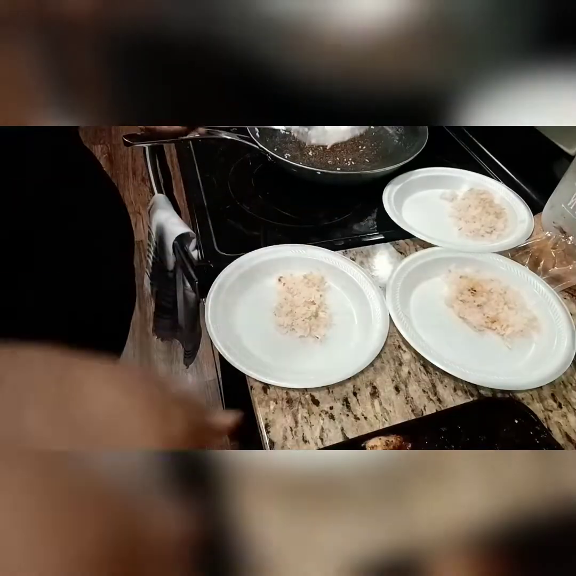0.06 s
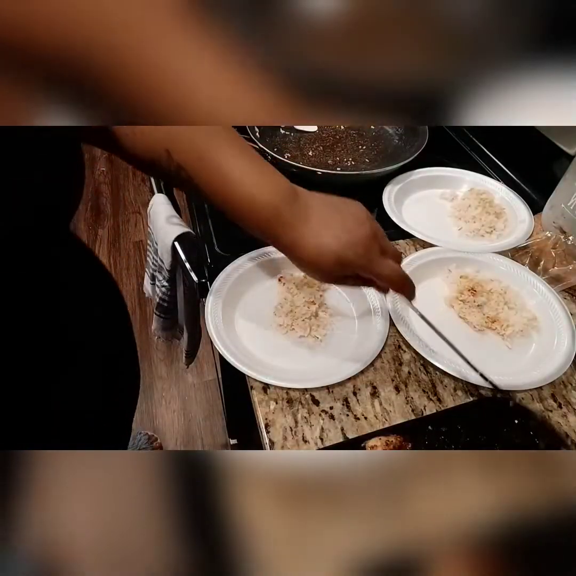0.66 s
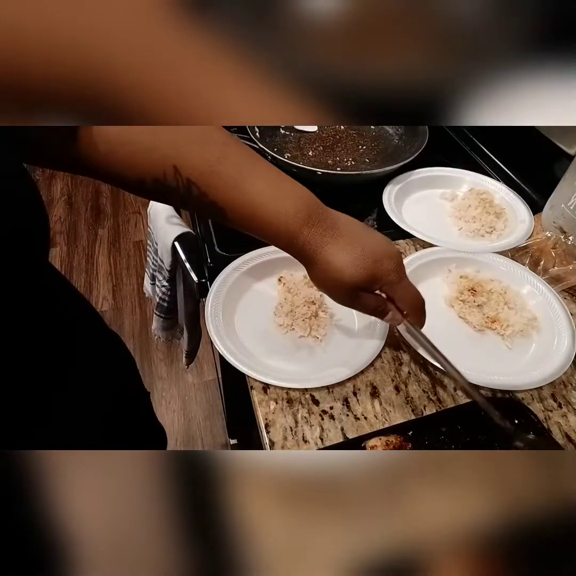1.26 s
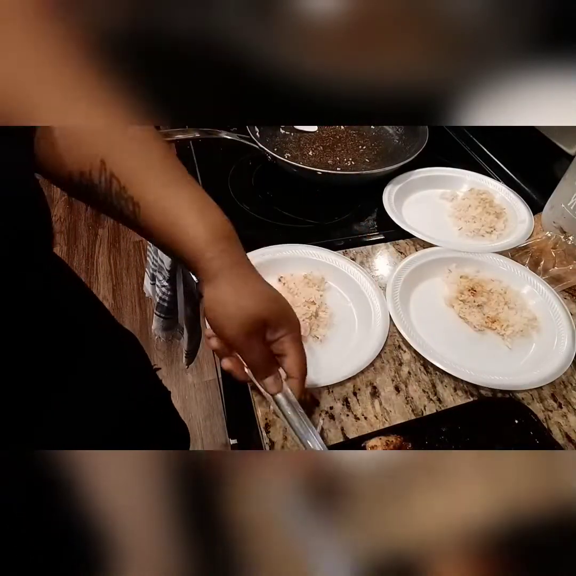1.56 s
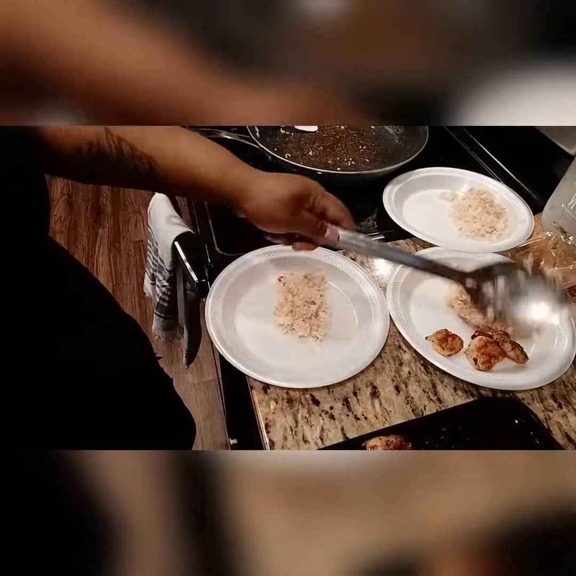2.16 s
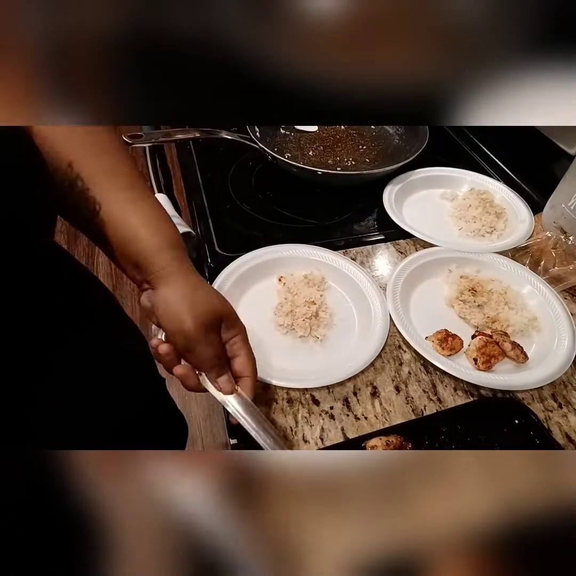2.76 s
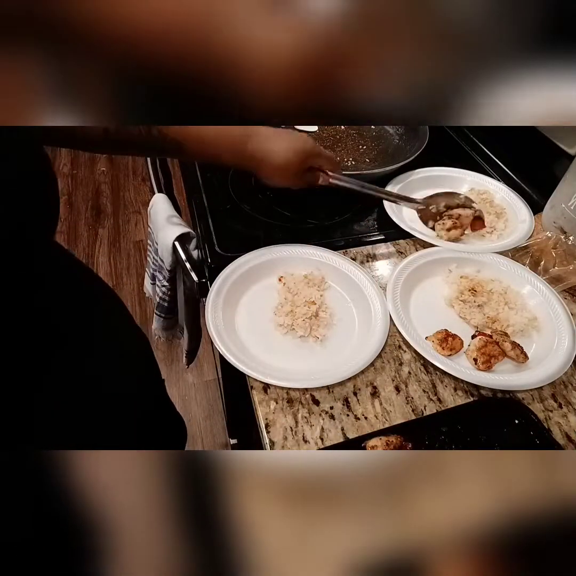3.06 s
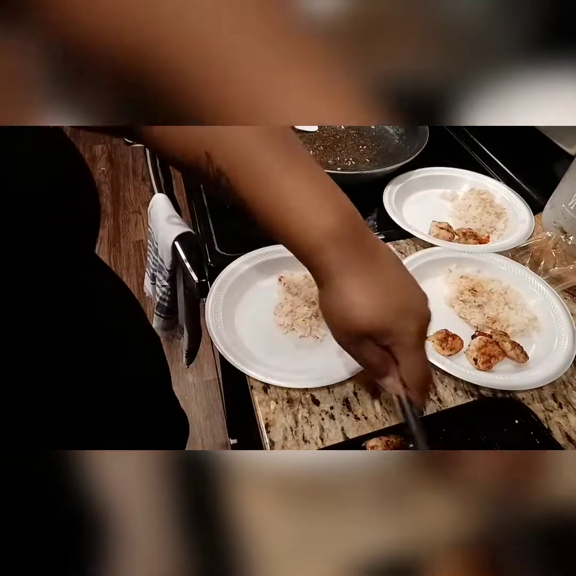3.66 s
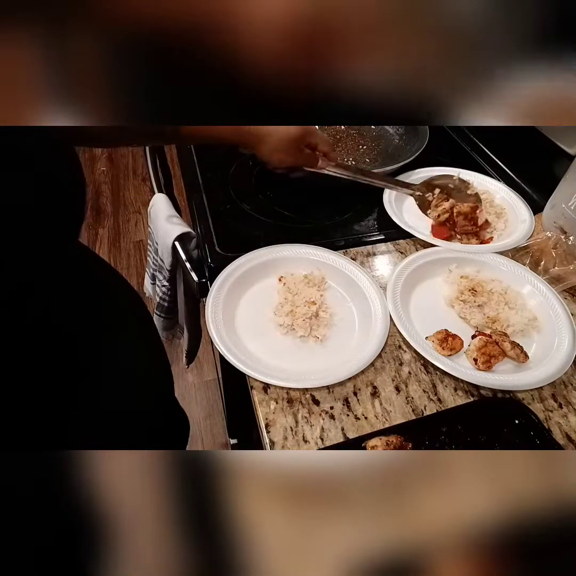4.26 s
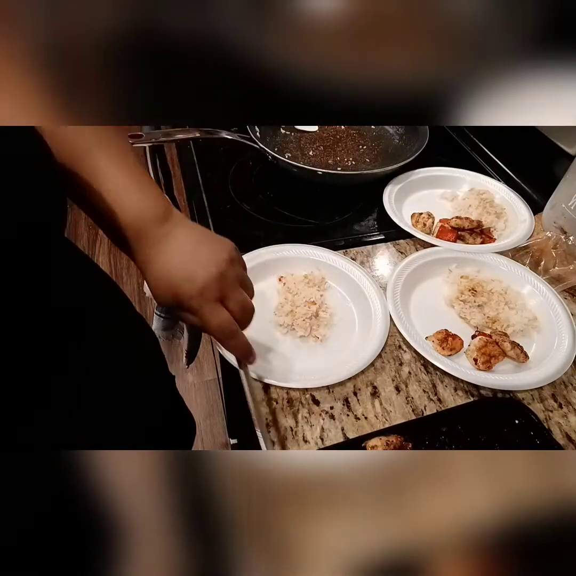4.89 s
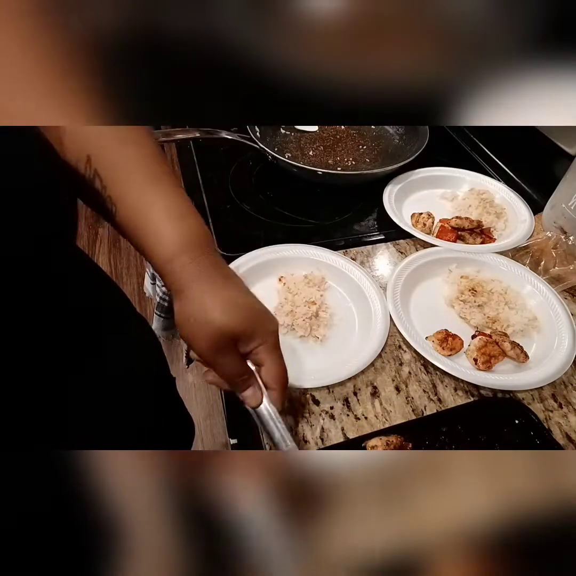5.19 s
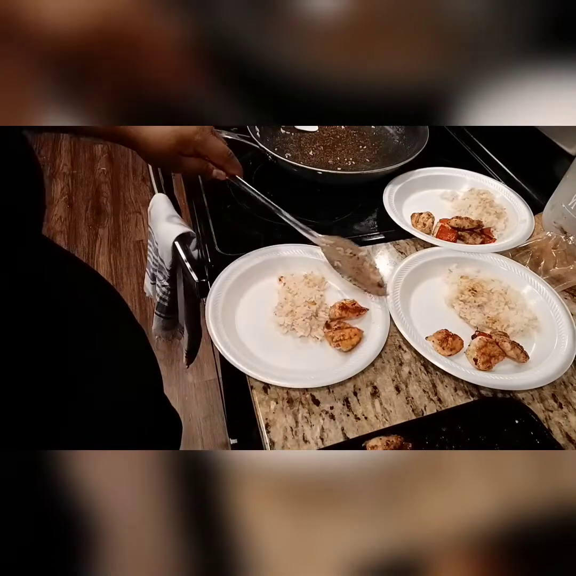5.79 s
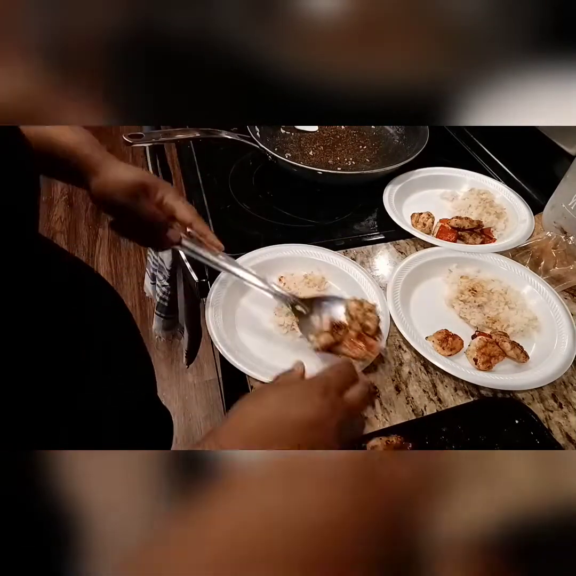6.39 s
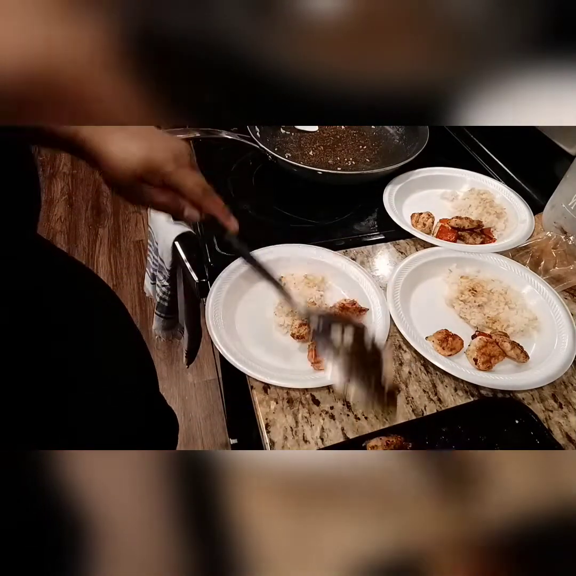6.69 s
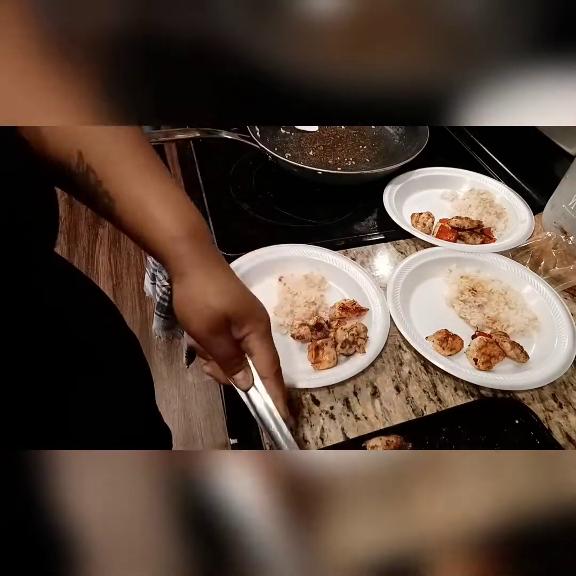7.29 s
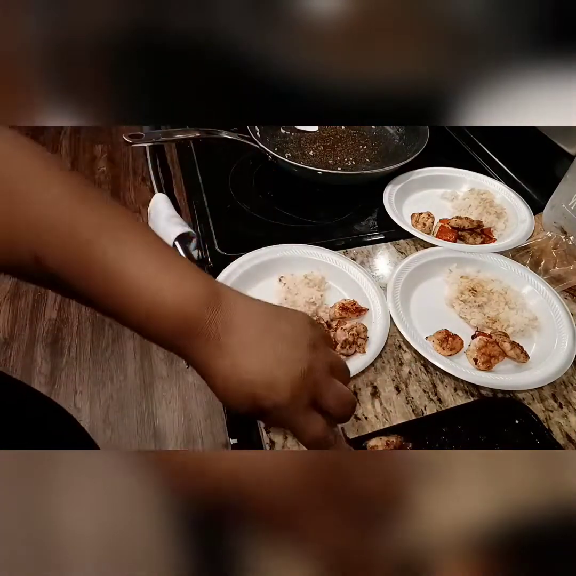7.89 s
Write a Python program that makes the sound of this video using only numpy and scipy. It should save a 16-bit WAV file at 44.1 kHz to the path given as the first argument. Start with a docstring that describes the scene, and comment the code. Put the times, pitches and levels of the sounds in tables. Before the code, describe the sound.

Close metal tongs knock against a pan between soft landings of food, while an appliance hums and a fan runs.

```python
"""Steel tongs knock and scrape in a skillet as food is served onto foam plates.
Small, hard-walled kitchen; close up, on the stereo microphones of a hand-held phone.
Food lands softly, clothing swishes; a few faint, dull thuds, then a muffled thump at the microphone.
Behind it an appliance hums with an even throb, over a fan's low rush and a faint, regular chafing.
The phone's gain control ducks after loud blows."""
import sys
import numpy as np
from scipy import signal
from scipy.fft import rfft, irfft
from scipy.io import wavfile
from scipy.ndimage import uniform_filter1d

SR = 44100
rng = np.random.default_rng(int(sys.argv[2]) if len(sys.argv) > 2 else 0)


def pcm_store(signal):
    """Save signal as 16-bit PCM."""
    levels = np.round(np.clip(np.atleast_2d(signal), -1, 1) * 32767)
    wavfile.write(sys.argv[1], SR, levels.astype(np.int16).T)


N = 355005
TIME = np.arange(N) / SR

# tongs strike the skillet: (time [s], rise [s], relative level [dB], body over level [dB],
# clang over ring [dB], top over level [dB], tong modes over pan modes [dB], share of free ring time [-])
TONG_BLOWS = [(1.1512, 0.0016, -14.5, -3.5, 1, -23.5, 6, 0.66),
              (1.2434, 0.0011, -20.5, -1, -6.5, -9.5, -3, 0.34),
              (2.229, 0.0045, -43, -1, 1.5, -2.5, 11.5, 0.43),
              (3.4373, 0.0044, -37, -1, -11, -36, -9, 0.36), (3.568, 0.017, -33.5, 2, -2.5, -6, -10, 0.47),
              (3.604, 0.0042, -24, -0.5, 0, -8.5, 2, 0.27),
              (4.776, 0.012, -24.5, -13.5, -11, -9.5, 5, 0.47),
              (4.8574, 0.0011, -27, -9.5, 4, 4, 14.5, 0.47), (5.042, 0.0034, -33.5, 2.5, 2, -2.5, -1, 0.38),
              (5.912, 0.017, -34, -1, 7, -4, 2, .35), (7.096, .014, -31, 2, 6.5, -3, 18, 0.28),
              (7.162, 0.0054, -51.5, 8, 4, -8, 6, 0.42),
              (7.8442, 0.0015, -20.5, -17.5, 5, -19.5, 8.5, 0.41),
              (7.876, 0.0062, -34, -8.5, 9, -6.5, 2, 0.35)]
# edges of the body, ring, clang and top bands: (frequency [Hz])
BAND_EDGES_HZ = [250, 800, 2200, 6000, 16000]
# resonances of the skillet and of the tongs: (frequency [Hz], relative level [dB], free t60 [s])
SKILLET_RING = [(235, -3, .15), (470, -14, .12), (560, -1, .14), (964, -4, .17), (1110, -3, .18),
                (1177, -4, .16), (1270, -5, .25), (1597, -7, .21), (1788, 1, .22), (1937, -3, .27),
                (2226, -8, .12), (2522, -3, .24), (2735, -4, .22), (2830, -4, .2), (3634, -13, .1),
                (3912, -4, .16), (4430, -10, .28), (4700, -9, .28), (5308, -17, .24), (6750, -13, .1),
                (7612, -18, .12)]
TONG_RING = [(1575, -4, .2), (1945, -9, .16), (2520, 3, .12), (2890, -4, .11), (3009, -5, .1),
             (3940, -12, .12), (4619, -12, .1), (4800, -9, .12), (5833, -14, .1), (7880, -16, .1),
             (10100, -17, .07), (11650, -18, .07), (12300, -16, .07), (13900, -18, .07)]
# tongs dragged across the pan: (start [s], length [s], relative level [dB])
TONG_DRAGS = [(1.154, .197, -31), (1.371, 0.023, -35)]
# steel on steel, struck and dragged: (frequency [Hz], gain [dB])
CRACK_SPECTRUM = [(200, -2), (370, -6), (540, 5), (820, -10), (1130, -1), (1400, -1), (1800, 0), (2850, 3),
                  (3450, -8), (4600, -3), (6000, -10), (8500, -13), (12000, -10), (16000, -11)]
SCRAPE_SPECTRUM = [(120, -29.5), (220, -18.5), (350, -11.5), (580, 2), (780, -7.5), (1100, 1), (1700, -6.5),
                   (2300, -7), (2800, -6), (3400, -16.5), (4500, -6.5), (6500, -24.5), (12000, -22.5),
                   (16000, -30)]
# food and tongs touch the plates: (time [s], rise [s], level [dB], tilt per band [dB])
PLATE_TOUCHES = [(1.493, 0.0044, -71.5, 7.5), (1.954, 0.0054, -59.5, 1.5), (2.54, 0.0057, -69, 5.5),
                 (3.008, 0.0012, -58.5, -1.5), (4.203, .001, -73, 0), (4.378, 0.0051, -60, -5),
                 (5.691, 0.0057, -56, -4.5), (5.719, 0.007, -54.5, -5.5), (6.435, .006, -59, -1.5),
                 (6.851, 0.0035, -59.5, -3), (7.607, 0.0015, -51.5, -1.5), (7.635, 0.0081, -52.5, 2.5)]
# food leaving the tongs, a reaching arm, muffled shuffling: (peak time [s], half length [s], level [dB])
FOOD_SLIDES = [(1.99, 0.033, -60.5), (2.28, 0.043, -58.5), (2.5, 0.099, -67.5), (3.1, .02, -58.5),
               (3.24, 0.011, -60), (3.39, .04, -60.5), (3.8, .025, -64.5), (4.355, 0.013, -51),
               (6.47, 0.044, -71), (6.82, 0.11, -66)]
ARM_SWISHES = [(.245, 0.096, -49.5), (.88, 0.041, -56), (1.06, 0.12, -44), (7.303, 0.021, -45.5),
               (7.435, 0.039, -49.5), (7.58, 0.014, -62), (7.67, 0.058, -57), (7.738, 0.014, -52.5)]
CLOTH_SHUFFLES = [(.11, 0.068, -45.5), (.495, .045, -45), (3.41, .07, -50.5)]
# cloth fibres near the microphones: (frequency [Hz], gain [dB])
CLOTH_SPECTRUM = [(410, -22), (700, -9.5), (1150, -10.5), (1380, -8.5), (1970, -6), (3500, -5.5),
                  (5060, -2.5), (7990, -11.5), (13000, -12.5), (16000, -20.5)]
# a faint low bump, two faint thuds, then a close thump in four pushes: (time [s], relative level [dB], push
# length [s])
LOW_THUDS = [(1.36, -30, 0.014), (4.425, -28, 0.012), (4.585, -27.5, 0.01), (5.2466, -7, 0.0037),
             (5.2585, -9.5, 0.0065), (5.274, -11.5, 0.0042), (5.285, -17, 0.0029)]
# their boomy resonances: (frequency [Hz], relative level [dB], t60 [s])
THUD_RING = [(70, -16.5, 0.11), (105, -5, 0.032), (191, -2.5, 0.027), (228.4, -5, 0.11), (348, -40, .05)]
# course of the appliance hum: (time [s], relative level [dB], throb depth [dB])
HUM_COURSE = [(0, -33.5, 1), (.15, -34.5, 1.5), (.33, -37, -0.5), (.65, -30.5, -1), (1.199, -36.5, 0.5),
              (2, -34, 1.9), (8.05, -34.5, 1.6)]
# partials of the hum: (harmonic number [-], relative level [dB])
HUM_HARMONICS = [(1, 7.5), (2, -30.5), (3, -42.5)]
# fan and room tone: (frequency [Hz], density [dB per Hz])
FAN_SPECTRUM = [(25, -106), (60, -83), (100, -74.5), (165, -74.5), (250, -75), (330, -73.5), (450, -83),
                (600, -88.5), (1000, -100.5), (2000, -108), (3200, -115), (5000, -113), (8000, -119),
                (15000, -119.5)]
# the faint chafing: (frequency [Hz], gain [dB])
CHAFE_SPECTRUM = [(900, -27), (1600, -10), (1900, 2.5), (2300, -18.5), (3500, -21), (4700, -19),
                  (5300, -17), (6300, -21), (9000, -31)]


def tong_clanks(crack_db=13, scatter_db=-4, scatter_s=.026, rough_db=3.5, metal_db=-4.5, bounce_s=.003):
    """Each blow is a gritty crack, its scatter off hob and counter, and the ring of pan and tongs."""
    out, t = np.zeros((2, N)), np.arange(SR // 3) / SR
    # a short, fixed pattern of close reflections off the counter, different at each microphone
    bounce = colour(noise(len(t)), CRACK_SPECTRUM) * np.exp(-t / bounce_s) * np.sqrt(2 / (bounce_s * SR))
    for s, rise_s, db, body_db, bright_db, top_db, tongs_db, free in TONG_BLOWS:
        fall_s = .003 + .63 * rise_s  # a contact that builds slowly lets go slowly
        force = pressure(t, rise_s, fall_s)
        crack = signal.fftconvolve(force * grit(len(t), rough_db)[:1], bounce)[:, :len(t)]
        direct = force * colour(grit(len(t), rough_db), CRACK_SPECTRUM)
        scatter = pressure(t, rise_s, scatter_s) * colour(noise(len(t)), CRACK_SPECTRUM)
        clatter = amp(crack_db) * (crack + direct) / np.sqrt(2) + amp(scatter_db) * scatter
        # each doubling of the contact time pumps the modes 5 dB harder
        pump_db = metal_db + 5 * np.log2((rise_s + fall_s) / .01)
        metal = ring(SKILLET_RING, force, t, free) + amp(tongs_db) * ring(TONG_RING, force, t, free)
        band_db = db + np.array([body_db, -bright_db / 2, bright_db / 2, top_db])
        add(out, s, set_bands(clatter + amp(pump_db) * metal, band_db))
    return out


def ring(modes, force, t, free, spread_db=1.5, split=.006, count=4):
    """Steel modes pumped by a force; grip and food damp each and split it into close partials."""
    out = 0
    for hz, db, t60 in modes:
        decay = np.exp(-np.log(1000) / (free * t60 * SR))
        swell = signal.lfilter([1 / force.sum()], [1, -decay], force)
        phase = rng.uniform(0, 2 * np.pi, (count, 1, 1))
        mic_phase = phase + rng.uniform(-np.pi, np.pi, (count, 2, 1)) * min(hz / 1800, 1)
        partials_hz = hz * (1 + split / free * rng.uniform(-.83, 1, (count, 1, 1)))
        tone = np.sin(2 * np.pi * partials_hz * t + mic_phase).sum(0) / np.sqrt(count)
        out = out + amp(db + spread_db * rng.standard_normal()) * swell * tone
    return out


def tong_scrape(bite_s=.012, lift_s=.006, rough_db=3, uneven_db=2, rasp_db=-2, ring_db=-4):
    """Steel sticks and slips on the pan floor under an uneven hand, keeping the pan ringing."""
    t = np.arange(SR // 4) / SR
    load = 0
    for s, length_s, db in TONG_DRAGS:
        bite = np.clip((TIME - s) / bite_s, 0, 1)
        lift = np.exp(-np.maximum(TIME - s - length_s, 0) / lift_s)
        load = load + amp(db) * bite * lift
    slips = grit(N, rough_db) * load * amp(uneven_db * walk(130))
    rasp = colour(slips, SCRAPE_SPECTRUM)
    ping = ring(SKILLET_RING, pressure(t, .00033, .00019), t, free=.48)
    pan = signal.fftconvolve(slips, ping, axes=1)[:, :N]
    return (amp(rasp_db) * unit(rasp) + amp(ring_db) * unit(pan)) * slips.std()


def plate_dabs(fall_s=.0061, rough_db=3):
    """Soft, damp contacts on foam plates, with no ring."""
    out, t = np.zeros((2, N)), np.arange(SR // 5) / SR
    for s, rise_s, db, tilt_db in PLATE_TOUCHES:
        touch = pressure(t, rise_s, fall_s + rise_s) * grit(len(t), rough_db)
        add(out, s, set_bands(touch, [db - tilt_db, db, db + tilt_db]))
    return out


def food_slides(rough_db=3):
    """Saucy food peels off the steel with a fine crackle that trails away."""
    spectrum = [(300, -9), (1500, 5.5), (5000, -3), (8000, -11.5), (14000, -10)]
    crackle = unit(colour(grit(N, rough_db), spectrum))
    return swells(FOOD_SLIDES, linger=2.3, steep=1.5) * crackle


def clothing(rough_db=2.34):
    """Close to the phone, cloth fibres brush past each other and the folds shuffle low and dull."""
    fold_spectrum = [(60, -22), (150, 4.5), (400, 2), (700, -12), (1500, -19), (4000, -60.5)]
    folds = unit(colour(noise(N), fold_spectrum))
    fibres = unit(colour(grit(N, rough_db), CLOTH_SPECTRUM))
    swishes = swells(ARM_SWISHES, linger=.85, steep=1.26) * fibres
    return swishes + swells(CLOTH_SHUFFLES, linger=.9, steep=1.3) * folds


def low_thuds(scuff_db=-28):
    """Faint, dull thuds, some like soft footsteps, then a muffled thump close to the microphone."""
    out, t = np.zeros((2, N)), np.arange(SR // 3) / SR
    scuff_spectrum = [(40, -36.5), (200, -1), (500, -6), (1000, -19), (4000, -32.5), (15000, -52)]
    modes = sum(-amp(db) * fade(t, t60) * np.cos(2 * np.pi * hz * t) for hz, db, t60 in THUD_RING)
    for s, db, push_s in LOW_THUDS:
        push = np.sin(np.pi * np.minimum(t / push_s, 1)) ** 2  # a longer push is duller
        boom = signal.fftconvolve(modes, push / push.sum())[:len(t)]
        scuff = unit(colour(noise(len(t)), scuff_spectrum)) * pressure(t, .0042, .035)
        add(out, s, amp(db) * (boom + amp(scuff_db) * scuff))
    return signal.sosfilt(signal.butter(2, 45, "high", fs=SR, output="sos"), out)


def appliance_hum(hz=120.1, throb_hz=2.21, crest_s=2.055, waver_db=2.4, left_db=-1.7, right_db=.47):
    """Twice the mains frequency, a little to the right; it swells once, then settles into a throb."""
    tone = sum(amp(db) * np.sin(2 * np.pi * k * hz * TIME) for k, db in HUM_HARMONICS)
    s, db, depth_db = np.transpose(HUM_COURSE)
    throb_db = np.interp(TIME, s, depth_db) * np.cos(2 * np.pi * throb_hz * (TIME - crest_s))
    level_db = np.interp(TIME, s, db) + throb_db + waver_db * walk(11)
    return unit(tone) * amp(level_db) * amp([[left_db], [right_db]])


def fan(flutter_db=1.5):
    """Room tone: the low, slightly unsteady rush of moving air."""
    rush = colour(noise(N, alike_hz=550), FAN_SPECTRUM) * np.sqrt(SR / 2)
    return rush * amp(flutter_db * walk(15))


def chafe(first_s=1.635, period_s=.606, half_s=.066, db=-64, uneven_db=2):
    """A faint, regular brushing in the background, as of a turning part, never quite equally hard."""
    moments = np.arange(first_s, N / SR, period_s)
    strokes = [(s, half_s, db + uneven_db * rng.standard_normal()) for s in moments]
    return swells(strokes, linger=1, steep=2.5) * unit(colour(noise(N), CHAFE_SPECTRUM))


def kitchen(x, wet_db=-18, low_t60=.3, high_t60=.18, build_s=.015):
    """A small hard room from close up: mostly direct sound, and a short tail whose treble dies first."""
    t = np.arange(int(.7 * SR)) / SR
    low = colour(noise(len(t)), [(200, 0), (1800, 0), (3000, -5), (8000, -18)]) * fade(t, low_t60)
    high = colour(noise(len(t)), [(2000, -28.5), (8000, 3.5)]) * fade(t, high_t60)
    tail = (low + high) * np.minimum(t / build_s, 1)
    tail /= np.sqrt(np.sum(tail ** 2) / 2)
    return x + amp(wet_db) * signal.fftconvolve(x, tail, axes=1)[:, :N]


def gain_control(x, threshold_db=-33, ratio=1.3, memory_s=.27, lag_s=.055):
    """The phone's gain sinks after loud sounds and recovers as their level is forgotten."""
    level_db = 10 * np.log10(follow(np.mean(x ** 2, axis=0), memory_s) + 1e-12)
    cut_db = np.maximum(level_db - threshold_db, 0) * (1 - 1 / ratio)
    return amp(-follow(cut_db, lag_s))


def pressure(t, rise_s, fall_s):
    """Contact force: builds up, then lets go."""
    return np.minimum(t / rise_s, 1) * np.exp(-np.maximum(t - rise_s, 0) / fall_s)


def swells(rows, linger, steep):
    """Envelope of smooth strokes: a bell around each peak, its far side scaled in time by linger."""
    out = 0
    for s, half_s, db in rows:
        away = (TIME - s) / np.where(TIME < s, half_s, half_s * linger)
        out = out + amp(db) * (1 + away ** 2) ** -steep
    return out


def set_bands(x, band_db):
    """Set each band's loudest 20 ms, from the top down: dry contact is bright, damp contact dull."""
    out = 0
    for lo, hi, db in zip(BAND_EDGES_HZ[-2::-1], BAND_EDGES_HZ[::-1], band_db[::-1]):
        band = signal.sosfilt(signal.butter(2, [lo, hi], "band", fs=SR, output="sos"), x)
        peak_rms = np.sqrt(uniform_filter1d(np.mean(band ** 2, axis=0), SR // 50).max())
        out = band * amp(db) / peak_rms - out  # signs alternate: neighbours meet in opposite phase
    return out


def grit(n, spread_db, size=12):
    """Noise broken into tiny contacts of uneven strength."""
    hiss = noise(n)
    strengths = amp(spread_db * np.minimum(rng.exponential(1, n // size + 1), 5))
    return unit(hiss * np.repeat(strengths, size)[:n])


def noise(n, alike_hz=450):
    """Noise at the two microphones: the same in the bass, unrelated in the treble."""
    mid, side = rfft(rng.standard_normal((2, n)))
    hz = np.arange(n // 2 + 1) * SR / n + 1
    apart = .5 / (1 + (alike_hz / hz) ** 2)
    return irfft(np.sqrt(1 - apart) * mid + np.sqrt(apart) * side * np.array([[1], [-1]]), n)


def colour(x, points):
    """Filter by a curve of (frequency [Hz], gain [dB])."""
    n = x.shape[-1]
    hz, db = np.transpose(points)
    bins_hz = np.arange(n // 2 + 1) * SR / n + 1
    return irfft(rfft(x) * amp(np.interp(np.log(bins_hz), np.log(hz), db)), n)


def walk(rate_hz):
    """Smooth random drift around zero."""
    k = int(SR / rate_hz)
    return .43 * uniform_filter1d(np.repeat(rng.standard_normal(N // k + 1), k), k)[:N]


def follow(x, lag_s):
    """One-pole smoothing."""
    pole = np.exp(-1 / (lag_s * SR))
    return signal.lfilter([1 - pole], [1, -pole], x)


def fade(t, t60):
    """Decay by 60 dB in t60 seconds."""
    return np.exp(-np.log(1000) * t / t60)


def amp(db):
    """Decibels to gain."""
    return 10 ** (np.asarray(db) / 20)


def unit(x):
    """Scale to an rms of one."""
    return x / np.sqrt(np.mean(x ** 2))


def add(out, s, x):
    """Mix a stereo sound in at s seconds."""
    i = int(s * SR)
    out[:, i:i + x.shape[1]] += x[:, :N - i]


def scene():
    """Serving up close in the kitchen, with hum, fan and chafing behind."""
    serving = amp(-2) * tong_clanks() + plate_dabs() + tong_scrape() + clothing() + food_slides()
    return kitchen(serving) + amp(2.5) * low_thuds() + appliance_hum() + fan() + chafe()


def record(dry, right_db=4):
    """Hand-held phone: the right microphone is brighter, the gain ducks and the very top is cut."""
    treble = signal.sosfilt(signal.butter(1, [2200, 9000], "band", fs=SR, output="sos"), dry)
    mics = dry + treble * (amp([[-right_db / 2], [right_db / 2]]) - 1)
    ducked = np.clip(mics * gain_control(mics), -1, 1)
    return signal.sosfilt(signal.ellip(10, .2, 80, 16100, fs=SR, output="sos"), ducked)


dry = scene()
out = record(dry)
pcm_store(out)
```